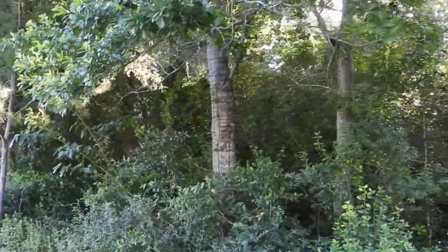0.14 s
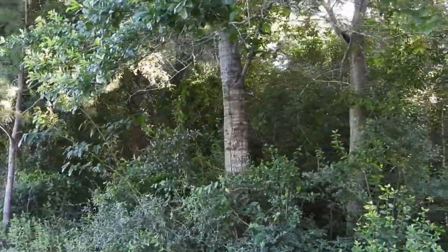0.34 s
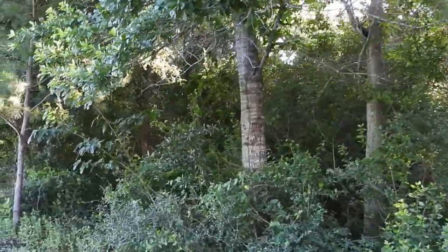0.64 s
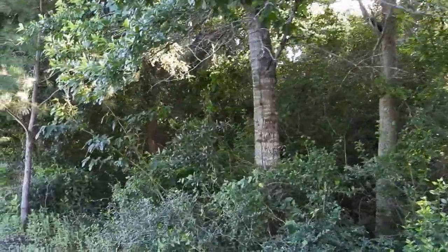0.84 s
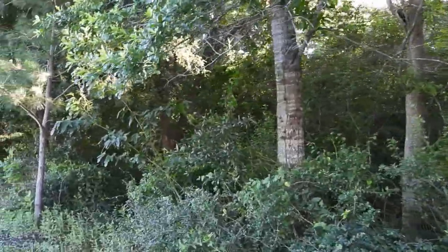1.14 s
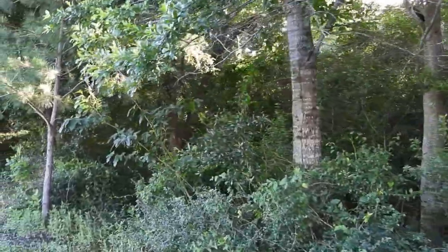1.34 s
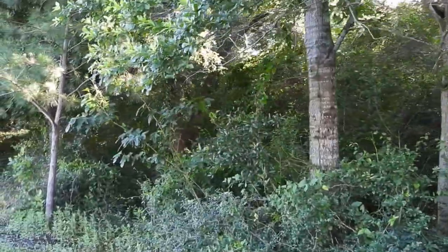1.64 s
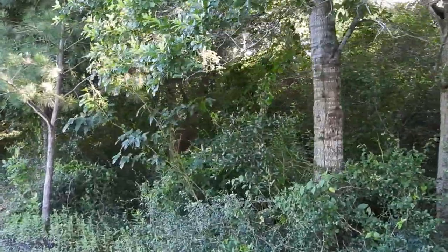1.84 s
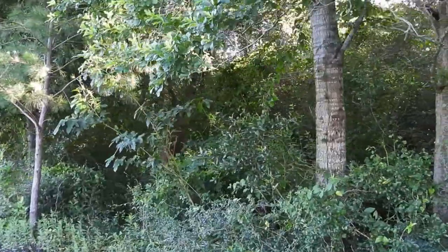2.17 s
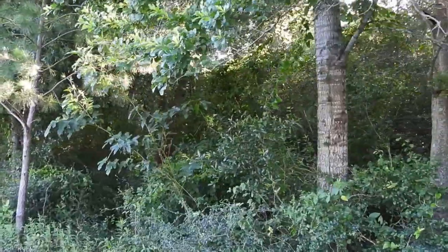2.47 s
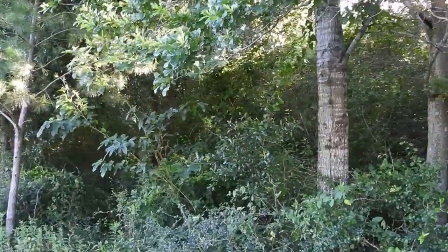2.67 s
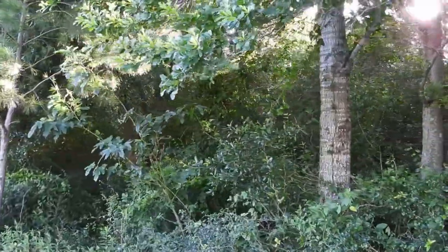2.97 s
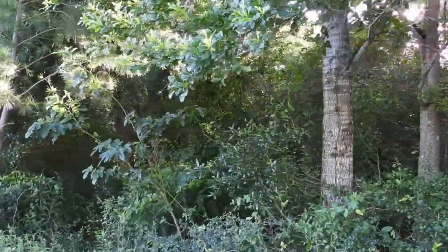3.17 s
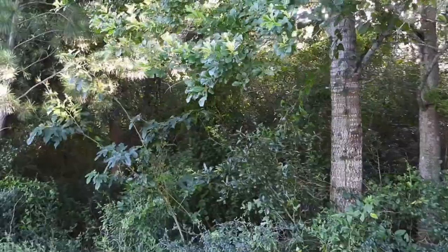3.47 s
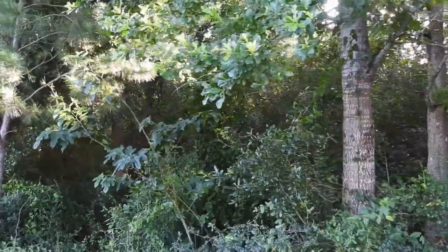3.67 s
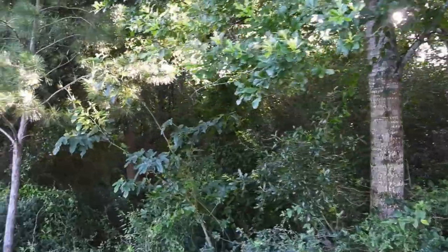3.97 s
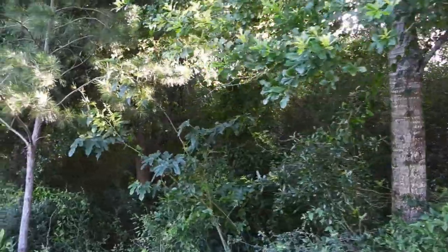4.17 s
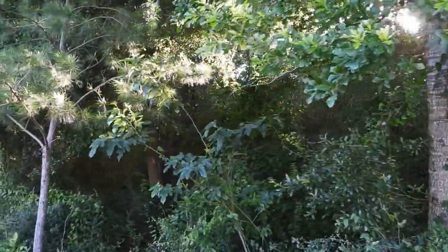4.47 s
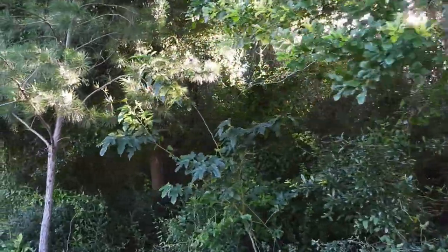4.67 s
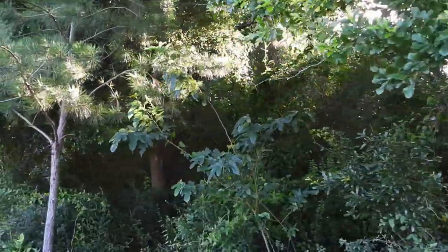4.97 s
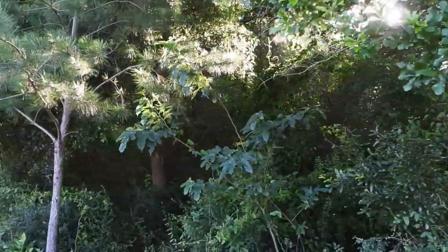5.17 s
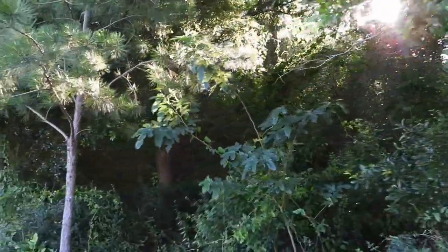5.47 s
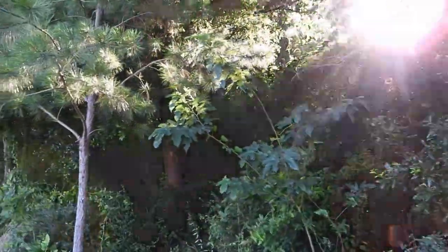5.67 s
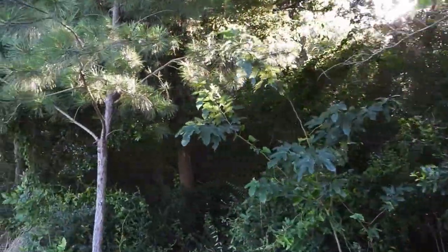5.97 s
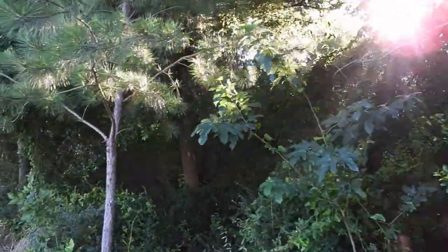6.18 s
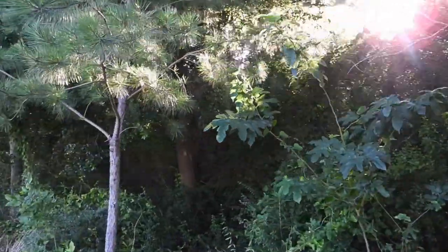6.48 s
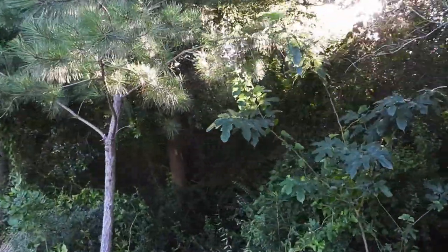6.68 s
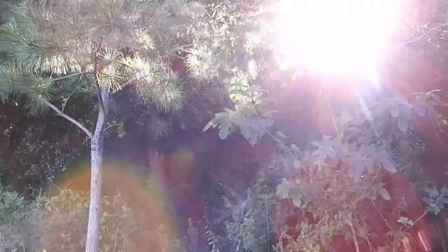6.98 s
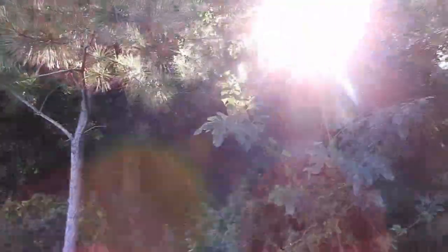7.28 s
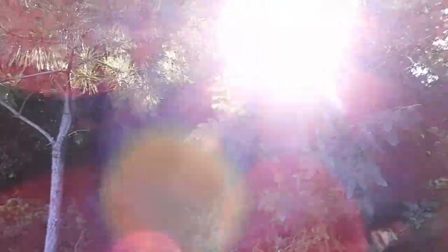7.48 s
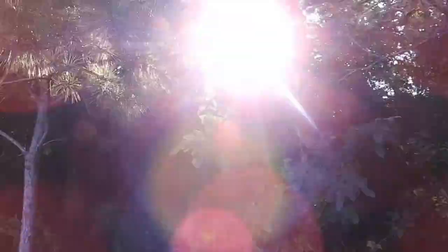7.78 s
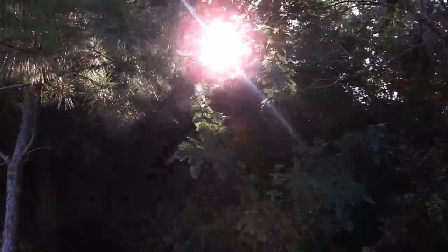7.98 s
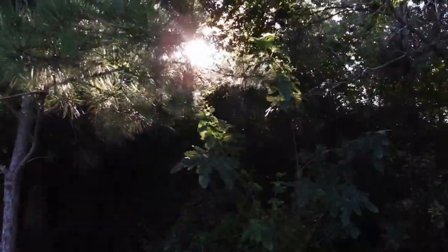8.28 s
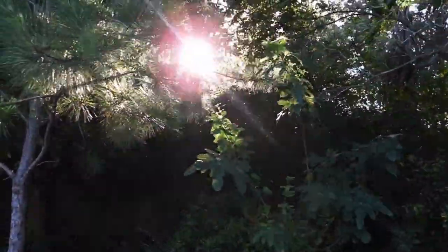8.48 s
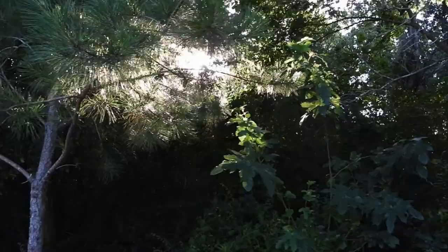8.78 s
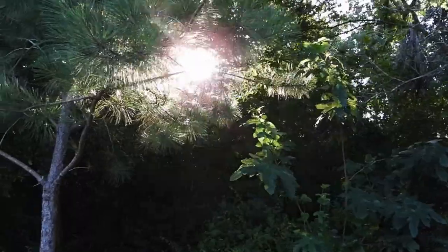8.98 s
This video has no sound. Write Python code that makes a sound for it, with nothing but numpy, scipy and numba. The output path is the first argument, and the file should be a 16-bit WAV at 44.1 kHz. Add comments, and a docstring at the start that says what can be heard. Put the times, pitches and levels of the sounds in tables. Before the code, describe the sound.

A faint, high insect buzz and a low murmur of distant air run throughout, at the edge of a wood. From about 1 to 2.4 seconds a far bird gives very faint whistles and chips. At 2.5 seconds a wren sings a clear, ringing phrase until about 4 seconds: four repeated syllables, each a rising whistle and a steep falling slur, echoing among the trunks. At 4.6 seconds fingers knock on the hand-held microphone, three quick, loud, dull bumps on the right. Small twigs snap at about 4.8 and 5.7 seconds, with a faint leaf rustle and a few light bumps. The wren sings a second, similar phrase from 7 to about 8.6 seconds, with softer bumps near its end. The background lifts slightly during each phrase and sinks afterwards.

```python
"""At the edge of a wood, insects buzz over a murmur of distant air, and far birds call faintly.
A wren sings a ringing phrase: an opening slur and flick, then four times whistle, tick, slur and flick,
pure gliding tones scattered by leaves and trunks. Fingers bump the hand-held camera, leaves rustle and
twigs snap. The wren sings a second phrase, with softer bumps near its end.
The camera's noise gate lifts the background during each phrase and lets it sink afterwards."""
import sys
import numpy as np
from scipy import signal
from scipy.fft import rfft, irfft, next_fast_len
from scipy.io import wavfile
from scipy.ndimage import uniform_filter1d, map_coordinates
from numba import njit

SR = 44100
rng = np.random.default_rng(int(sys.argv[2]) if len(sys.argv) > 2 else 0)


def dump_mix(stems):
    """Bounce the given channels to the path in sys.argv[1] as a 16-bit WAV at rate SR."""
    frames = np.atleast_2d(stems).T  # one column per channel
    limited = np.clip(frames, -1, 1)  # hard clip at full scale
    pcm = np.round(limited * 32767).astype(np.int16)
    wavfile.write(sys.argv[1], SR, pcm)


N = 402191

# The wren's note contours: offset_s, pitch_hz, level_db
OPENING_SLUR = [(0, 4830, -11.5), (.009, 4470, 0.5), (.02, 3900, -4), (.031, 3556, -4)]
GRACE = [(0, 2074, -4.5), (.012, 1987, 0), (.034, 2040, -15)]
WHISTLE = [(0, 2231, -17), (.01, 2525, -9), (.025, 2704, -6.5), (.045, 2915, -7), (.052, 3059, -1.5),
           (.064, 3143, 0.5), (.076, 3140, -12.5)]
TICK = [(0, 5790, -4.5), (.005, 6300, 4.5), (.010, 6950, -3.5)]
LISP = [(0, 7240, -4), (.012, 6590, 3.5), (.03, 6200, -1.5), (.047, 5450, -5.5)]
SLUR = [(0, 5500, -5.5), (.009, 5000, -2), (.016, 4373, 0.5), (.024, 3800, -5), (.034, 3580, -4.5)]
FLICK = [(0, 2953, -6), (.004, 3177, 1), (.010, 3501, 1.5), (.015, 3950, -6.5), (.021, 4565, -10)]
# Cues for the slur that opens each phrase: start_s, level_db
OPENINGS = [(2.473, -27), (7.004, -29)]
# Syllable cues: start_s, whistle_db, slur_db, whistle_pitch_ratio, grace_db (None for no grace note)
SYLLABLES = [(2.623, -23.5, -26, 1, None), (2.975, -20, -26.5, 1.009, None), (3.330, -20.5, -25, 1.0, None),
             (3.709, -22.5, -26, 1.018, -51), (7.16, -25.5, -27.5, 0.98, None),
             (7.526, -22, -26, 1.012, None), (7.900, -21.5, -26.5, 0.99, -38.5),
             (8.266, -22.5, -27.5, 1.003, -40.5)]


def wren(slur_after_s=.202, flick_after_s=.045, flick_db=-0.14):
    """Each syllable whistles upward, ticks, falls from a high lisp into a steep slur, and flicks up."""
    low, high = [], []
    for s, db in OPENINGS:
        high.append((s, db, note(OPENING_SLUR)))
        low.append((s + flick_after_s, db + flick_db, note(FLICK)))
    for s, whistle_db, slur_db, pitch, grace_db in SYLLABLES:
        slur_s = s + slur_after_s
        low.append((s, whistle_db, note(WHISTLE, pitch)))
        low.append((slur_s + flick_after_s, slur_db + flick_db, note(FLICK)))
        high.append((slur_s - .078, slur_db - 15.5, note(TICK)))
        high.append((slur_s - .045, slur_db - 10.5, note(LISP)))
        high.append((slur_s, slur_db, note(SLUR)))
        if grace_db is not None:
            low.append((s - .037, grace_db, note(GRACE)))
    whistles, slurs = np.zeros((2, 2, N))
    for s, db, tone in low:
        add(whistles, s, amp(db) * through_wood(tone, direct_db=-2.5, near_db=-6.5, far_db=-3.5))
    for s, db, tone in high:  # the high notes ring with a louder reverb tail
        add(slurs, s, amp(db) * through_wood(tone, direct_db=-2.2, near_db=-6.5, far_db=-0.3))
    return placed(whistles, pan_db=-3.5, lag_ms=0.061) + placed(slurs, pan_db=-1.3, lag_ms=0.062)


def note(contour, pitch=1, waver=.005, flutter_db=2.5, fade_s=0.0012):
    """One pure tone of the syrinx, gliding along its contour with a tremble of pitch and strength."""
    s, hz, db = np.transpose(contour)
    t = np.arange(int(s[-1] * SR)) / SR
    jitter = rng.standard_normal((2, len(t) + 255))
    tremble, flutter = unit(signal.fftconvolve(jitter, np.hanning(256)[None], "valid", axes=1))
    pitch_hz = pitch * np.interp(t, s, hz) * (1 + waver * tremble)
    envelope = amp(np.interp(t, s, db) + flutter_db * flutter)
    fades = np.clip(np.minimum(t, t[-1] - t) / fade_s, 0, 1)
    return envelope * fades * np.sin(2 * np.pi * np.cumsum(pitch_hz) / SR)


# Reverb decay among the trunks, before the echoes escape: frequency_hz, t60_s
WOOD_DECAY = [(2000, 0.45), (3100, 0.7), (3900, 0.68), (4550, 1.07), (5000, 0.63), (7000, 0.43)]


def through_wood(x, direct_db, near_db, far_db, near_t60_s=0.0987, build_s=0.0063, reach_s=0.33):
    """The direct sound, quick scatter from nearby leaves and the trunks' long tail, new for each note."""
    size, correlation = 24576, 0.55
    t = np.arange(size) / SR
    left, right, common = rng.standard_normal((3, size))
    scatter = np.sqrt(1 - correlation) * np.array([left, right]) + np.sqrt(correlation) * common
    hz, frame_s, bands = signal.stft(scatter, SR, nperseg=512)
    decay = amp(-60 * frame_s / along(WOOD_DECAY, hz)[:, None])
    trunks = signal.istft(bands * decay, SR, nperseg=512)[1][:, :size]
    trunks *= (1 - np.exp(-t / build_s)) * np.exp(-(t / reach_s) ** 2)  # echoes build up, then escape
    leaves = rng.standard_normal(size) * amp(-60 * t / near_t60_s)
    impulse = (amp(far_db) * unit(trunks) + amp(near_db) * unit(leaves)) / np.sqrt(size)
    impulse[:, 0] += amp(direct_db)
    return signal.fftconvolve(x[None], impulse, axes=1)


# Finger knocks on the camera: centre_s, level_db, pitch_hz, half_width_s, pan_db (left minus right)
KNOCKS = [(4.5944, -13, 327, 0.0019, -35), (4.622, -18.5, 272, 0.0021, -27), (4.646, -16, 378, 0.0015, -30),
          (5.085, -39, 228, 0.0045, 5), (5.2, -41, 210, 0.0031, 4), (6.218, -35.5, 209, 0.0032, 18),
          (8.149, -32.5, 245, 0.0061, 25), (8.427, -35, 224, .0061, -8), (8.599, -44.5, 150, 0.0056, 24)]


def handling(creaks=7, creak_db=-53, creak_spread_db=3, creak_hz=197.4, creak_half_s=0.0048):
    """Each finger contact shakes the case for a few cycles; the grip creaks faintly at random moments."""
    t = np.arange(-SR // 20, SR // 20) / SR
    stages = [(-0.007, -15.5), (0, 0), (0.00802, -13.5)]  # touch, knock, rebound: offset_s, trim_db
    contacts = [(s + offset_s, db + trim_db, hz, half_s, pan_db)
                for s, db, hz, half_s, pan_db in KNOCKS for offset_s, trim_db in stages]
    for when, strength in rng.random((creaks, 2)):
        s = t[-1] - t[0] + when * (N - 2 * len(t)) / SR
        contacts.append((s, creak_db + creak_spread_db * (2 * strength - 1), creak_hz, creak_half_s, 0))
    out = np.zeros((2, N))
    for s, db, hz, half_s, pan_db in contacts:
        thud = np.exp(-(t / half_s) ** 2 / 2) * np.sin(2 * np.pi * hz * t)
        add(out, s + t[0], amp(db + np.minimum([[pan_db], [-pan_db]], 0)) * thud)
    return out


# Soft leaf swells: centre_s, level_db, half_width_s
RUSTLES = [(1.203, -61, .04), (4.508, -63, 0.15), (5.02, -53.5, .07), (5.933, -57, .035),
           (6.718, -61.5, 0.035)]
# Twig snap cues: start_s, level_db
SNAPS = [(0.169, -56), (4.7632, -38.5), (5.7098, -45.5)]
# Tone colour of leaves and twigs: frequency_hz, level_db
LEAF_EQ = [(100, -30), (500, -4.5), (1200, -6), (2300, -4.5), (3500, -2.5), (4500, -14.5), (9000, -15)]
TWIG_EQ = [(1500, -39), (2400, -19), (2950, 2.5), (3600, -4), (4450, 5), (5200, -19.5), (10000, -23)]


def undergrowth(snap_trim_db=2, snap_t60_s=0.035, grain_db=3):
    """Leaves brush in grainy swells of noise, and a few twigs snap in short bursts."""
    t = np.arange(N) / SR
    swells = sum(amp(db) * np.exp(-np.minimum(np.abs(t - s) / half_s, 10) ** 2 / 2)
                 for s, db, half_s in RUSTLES)
    bursts = np.zeros(N)
    for s, db in SNAPS:
        add(bursts, s, amp(db + snap_trim_db - 60 * t[:SR // 10] / snap_t60_s))
    leaves = swells * amp(grain_db * wobble(120)) * noise(LEAF_EQ, [(3000, 0.53)])
    return leaves + bursts * noise(TWIG_EQ, [(3000, 0.28)])


# The far birds' note contours: offset_s, pitch_hz, level_db
FAR_WHISTLE = [(0, 3000, -16), (.03, 2868, 3.5), (.08, 2820, -4)]
FAR_CHIP = [(0, 3260, -6.5), (.01, 3430, 7), (0.023, 3750, -7.5)]
FAR_RISE = [(0, 1950, -5), (.14, 2280, -3), (.28, 2650, -7.5)]


def far_birds(start_s=0.96, period_s=.378, chip_after_s=.148, repeats=4, rise_s=2.11, rise_db=-65):
    """Deep among the trees, fading whistles alternate with growing chips, and one long note rises."""
    calls = [(rise_s, rise_db, FAR_RISE)]
    for k in range(repeats):
        s = start_s + k * period_s
        calls += [(s, -58 - 6.5 * k, FAR_WHISTLE), (s + chip_after_s, -63 + 3 * k, FAR_CHIP)]
    out = np.zeros((2, N))
    for s, db, contour in calls:
        add(out, s, amp(db) * through_wood(note(contour), direct_db=-1, near_db=-5.5, far_db=-15))
    return out * amp([[2.5], [-2.5]])  # left of centre


# Tone colour of the two insect choruses: frequency_hz, level_db
CRICKET_EQ = [(4300, -32.5), (5100, -14), (5500, -2), (5750, 0.5), (6050, -8.5), (6600, -14.5), (7300, -29)]
CICADA_EQ = [(5800, -32.5), (6700, -17.5), (7300, -6), (7900, 1.5), (8300, -1.5), (8900, -5.5), (9600, -4),
             (10100, -12.5), (10500, -23.5)]


def insects(cricket_db=-59.5, cicada_db=-55.0, stroke_hz=57.0, stroke_depth=0.18):
    """Two choruses blur into bands of noise; the nearest wing strokes make the crickets flutter."""
    strokes = np.sin(2 * np.pi * np.cumsum(stroke_hz + .4 * wobble(2.2)) / SR)
    flutter = 1 + stroke_depth * strokes
    crickets = noise(CRICKET_EQ, [(5700, 0.34)]) * flutter * amp(cricket_db + .6 * wobble(16))
    cicadas = noise(CICADA_EQ, [(8000, 0.27)]) * amp(cicada_db - 0.47 * wobble(2.97))
    return placed(crickets, pan_db=-0.5, lag_ms=0.0905) + placed(cicadas, pan_db=.8, lag_ms=0.044)


# Tone colour of the murmur and the rumble under it: frequency_hz, level_db
MURMUR_EQ = [(25, -48.5), (60, -40.5), (100, -44), (150, -29), (200, -4), (350, 1.5), (620, -2), (900, -1),
             (1300, -5), (1750, -12.5), (2800, -16.5), (3600, -24), (4000, -30.5), (4500, -23.5),
             (10000, -25.5)]
RUMBLE_EQ = [(30, -32.5), (90, -26), (150, -6), (190, 2.5), (300, -3), (700, -51.5)]
# Stereo image of the murmur: frequency_hz, left_right_correlation
MURMUR_IMAGE = [(60, 0.41), (120, -0.56), (260, 1), (530, 0.89), (1090, 0.8), (2260, 0.49), (4660, -0.093),
                (9630, -0.13)]


def air(murmur_db=-52.5, rumble_db=-66, lump_db=4):
    """A low, nearly even murmur of distant air and road, with a faint lumpy rumble under it."""
    swell_db = .4 * wobble(7)
    murmur = noise(MURMUR_EQ, MURMUR_IMAGE) * amp(murmur_db + swell_db)
    rumble = noise(RUMBLE_EQ, [(150, 0.15)]) * amp(rumble_db + lump_db * wobble(12))
    return placed(murmur, pan_db=0.7, lag_ms=-0.024) + rumble


def amp(db):
    """Decibels to gain."""
    return 10 ** (np.asarray(db) / 20)


def unit(x):
    """x at rms 1."""
    return x / np.sqrt(np.mean(x ** 2) + 1e-20)


def along(points, hz):
    """Read a curve of (frequency_hz, value) points on a log frequency axis."""
    point_hz, values = np.transpose(points)
    return np.interp(np.log(hz + 1), np.log(point_hz + 1), values)


def wobble(rate_hz):
    """A smooth random curve with rate_hz knots a second."""
    knots = rng.standard_normal(int(N * rate_hz / SR) + 4)
    grid = np.arange(0, N + 32, 32)
    return np.interp(np.arange(N), grid, map_coordinates(knots, [grid * rate_hz / SR]))


def filtered(x, response):
    """x shaped by a frequency response."""
    n = x.shape[-1]
    padded = next_fast_len(n + 4096)
    return irfft(rfft(x, padded) * response(np.fft.rfftfreq(padded, 1 / SR)), padded)[..., :n]


def add(out, s, sound):
    """Mix a sound in at s seconds."""
    start = round(s * SR)
    out[..., start:start + sound.shape[-1]] += sound[..., :N - start]


def placed(x, pan_db, lag_ms):
    """Place a sound in stereo: the left channel is pan_db louder and lag_ms later than the right."""
    side = np.array([[.5], [-.5]])
    return amp(side * pan_db) * filtered(x, lambda hz: np.exp(-2j * np.pi * hz * side * lag_ms / 1000))


def noise(eq, image):
    """Stereo noise of rms 1, coloured by eq, with image as its left-right correlation by frequency."""
    def mid_side_gains(hz):
        angle = np.arccos(np.clip(along(image, hz), -1, 1)) / 2
        return amp(along(eq, hz)) * [np.cos(angle), np.sin(angle)]
    mid, side = filtered(rng.standard_normal((2, N)), mid_side_gains)
    return unit(np.array([mid + side, mid - side]))


@njit
def follow(target, rise, fall):
    """Chase a target in limited steps up and down."""
    out, level = np.empty_like(target), target[0]
    for i in range(len(target)):
        level += min(max(target[i] - level, -fall), rise)
        out[i] = level
    return out


def scene():
    """The wren and the hand on the camera, over the bed of the wood."""
    return wren() + handling() + undergrowth() + far_birds() + insects() + air()


def record(dry, threshold_db=-43, closed_db=-7.0, open_s=0.13, close_s=0.65, react_s=0.019, top_hz=10350):
    """A gentle noise gate, keyed by the treble, opens fast and closes slowly; a high cut follows."""
    treble = filtered(dry, lambda hz: hz > 1500)
    power = uniform_filter1d(np.mean(treble ** 2, axis=0), size=1024)
    loud = np.roll(power > amp(threshold_db) ** 2, int(react_s * SR)).astype(float)
    opening = follow(loud, 1 / (open_s * SR), 1 / (close_s * SR))
    gated = dry * amp(closed_db * (1 - opening))
    return filtered(gated, lambda hz: hz < top_hz)


dry = scene()
out = record(dry)
dump_mix(out)
```